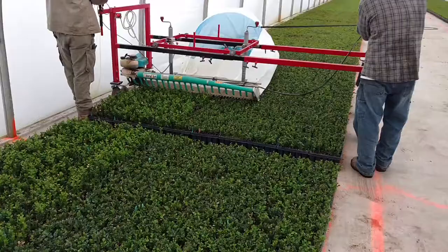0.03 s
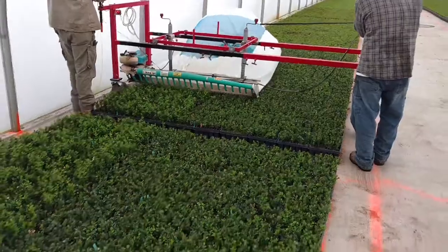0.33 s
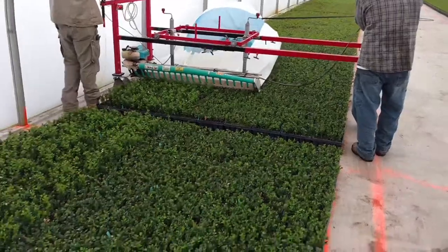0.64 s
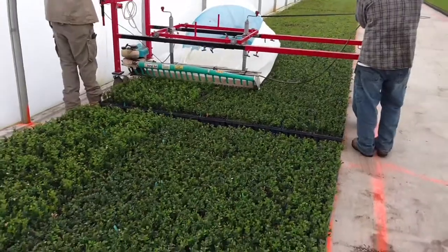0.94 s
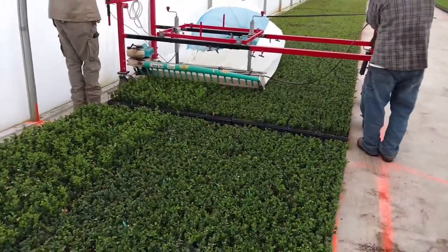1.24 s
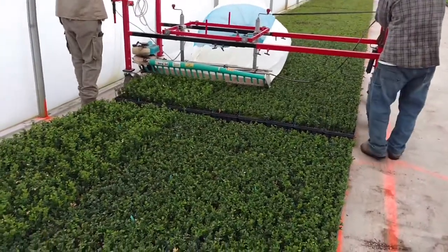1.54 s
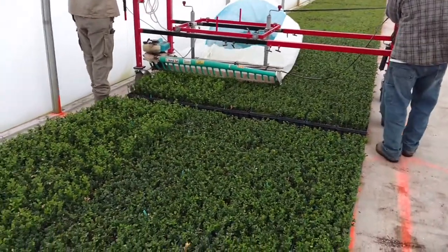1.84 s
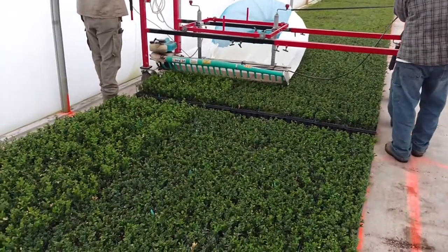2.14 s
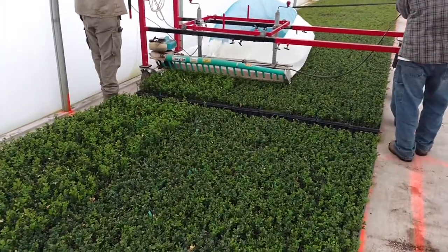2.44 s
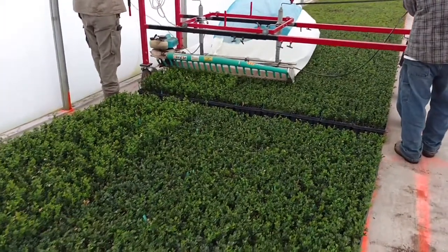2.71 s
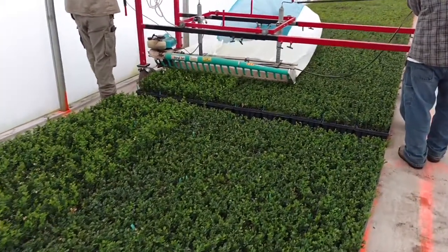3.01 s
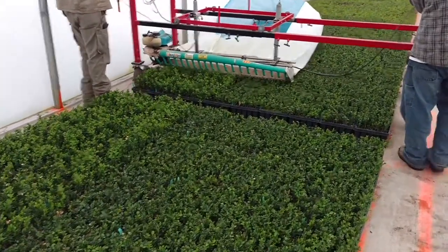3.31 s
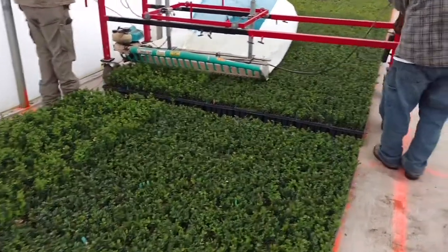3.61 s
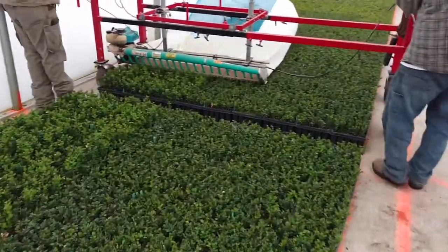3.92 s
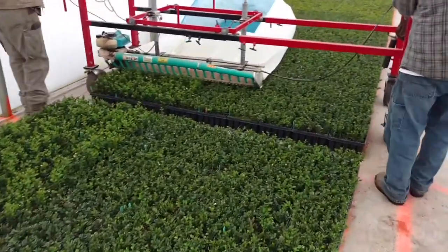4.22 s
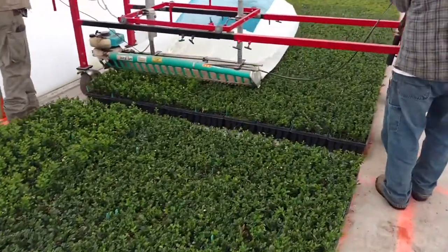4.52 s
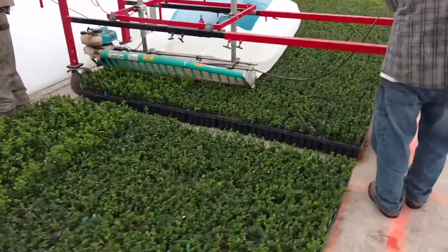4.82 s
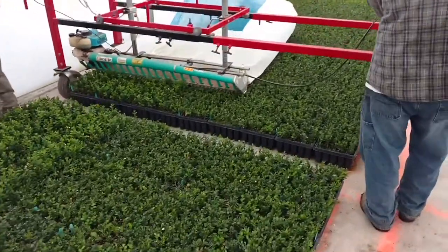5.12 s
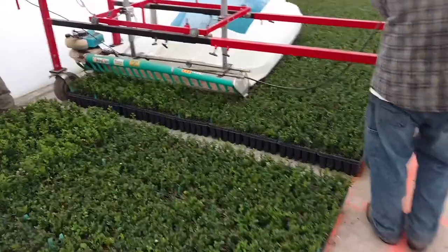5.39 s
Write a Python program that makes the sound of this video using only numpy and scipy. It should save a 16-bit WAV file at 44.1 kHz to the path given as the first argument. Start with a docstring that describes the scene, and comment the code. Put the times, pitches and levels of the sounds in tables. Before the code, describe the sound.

The steady buzzing drone of a motorised trimmer in a greenhouse, with whirring blades and finely crackling stems.

```python
"""Plant trimmer in a long greenhouse

A small petrol engine on a gantry drives a cutter bar, heard from a hand-held stereo camera. The exhaust
drones at a steady speed; standing waves lift and sink single notes as machine and listener move.
Fan and blades add a rush that beats with the firings and the knife strokes, and stems snap in the bar.
Near the end a finger shifts on the camera."""
import sys
import numpy as np
from scipy import signal
from scipy.fft import rfft, irfft
from scipy.io import wavfile
from scipy.ndimage import uniform_filter1d

SR = 44100
rng = np.random.default_rng(int(sys.argv[2]) if len(sys.argv) > 2 else 0)


def output_pcm(signal):
    """Save a mono or channel-first signal as 16-bit PCM at the path in sys.argv[1].

    Samples are clipped to [-1, 1] before scaling.
    """
    pcm = np.clip(np.atleast_2d(signal).T, -1, 1) * 32767
    wavfile.write(sys.argv[1], SR, np.round(pcm).astype(np.int16))


N = 244755
T = np.arange(N) / SR
HZ = np.fft.rfftfreq(N, 1 / SR)


def gain_of(db):
    """Decibels to amplitude."""
    return 10 ** (np.asarray(db) / 20)


def unit_rms(x):
    """Scales to rms 1."""
    return x / np.sqrt(np.mean(abs(x) ** 2) + 1e-20)


def spectrum(points):
    """Spreads (frequency, value) points over HZ on a log-frequency axis."""
    hz, value = np.transpose(points)
    return np.interp(np.log(HZ + 1), np.log(hz + 1), value)


def swell(curve, share=1):
    """A dB curve, or a share of its swing, as a gain of rms 1: only its shape counts."""
    return unit_rms(gain_of(share * np.interp(T, *np.transpose(curve))))


def nearing(db_per_s):
    """The steady rise of an approaching source, as a gain of rms 1."""
    return unit_rms(gain_of(db_per_s * T))


def arches(rows):
    """Smooth arches of level, in dB."""
    return sum(db * np.cos(np.pi * np.clip((T - s) / length, -.5, .5)) ** 2 for s, length, db in rows)


def drift(rate_hz, hop=16):
    """A smooth random wander of rms 1, up to about rate_hz."""
    frames = N // hop + 2
    hz = np.fft.rfftfreq(frames, hop / SR)
    slow = irfft(rfft(rng.standard_normal(frames)) / (1 + (hz / rate_hz) ** 4), frames)
    return unit_rms(np.interp(np.arange(N) / hop, np.arange(frames), slow))


def decays(kicks, decay_s):
    """Each kick becomes a sudden rise and a slow fall; mean 1."""
    shape = signal.lfilter([1], [1, -np.exp(-1 / (decay_s * SR))], kicks)
    return shape / shape.mean()


def impacts(per_s, decay_s):
    """The envelope of hits at random times and strengths; mean 1."""
    return decays(rng.exponential(1, N) * (rng.random(N) < per_s / SR), decay_s)


# Single exhaust orders in the standing waves at the microphone (time [s], relative level [dB])
ORDER_2 = [(.3, -36.5), (1.0, -36), (2.0, -36), (2.8, -38.5), (3.3, -38.5), (3.8, -38.7), (4.5, -39),
           (5.5, -41.5)]
ORDER_4 = [(.3, -28.5), (1.3, -28), (2.3, -30), (3.0, -26.5), (3.5, -28), (3.8, -26.5), (4.55, -26),
           (5.5, -28.5)]
ORDER_5 = [(.3, -27.5), (.9, -30), (2.2, -29.5), (2.8, -29.5), (3.05, -29.5), (3.52, -36.5), (3.9, -31.5),
           (4.7, -32), (5.5, -28)]
ORDER_6 = [(0.3, -27), (1.3, -31), (2.1, -31), (2.4, -29), (3.0, -27), (3.25, -27.5), (3.52, -41),
           (3.7, -29.5), (4.4, -27), (4.7, -33.5), (5.3, -39), (5.5, -39)]
ORDER_7 = [(.3, -32.5), (1.0, -34.5), (2.0, -30.5), (2.6, -27.5), (3.05, -31.5), (3.52, -49), (3.75, -31),
           (4.3, -35), (4.7, -36), (4.9, -32), (5.5, -34)]
ORDER_8 = [(0.3, -53), (0.41, -35), (1.79, -50), (4.2, -39), (4.96, -42), (5.21, -35), (5.5, -40)]
ORDER_9 = [(.3, -27), (1.35, -33.5), (1.7, -25), (2.1, -29), (2.45, -22.5), (3.0, -25.5), (3.7, -26),
           (4.5, -29.5), (5.5, -29)]
ORDER_10 = [(.3, -38), (1.9, -33), (2.25, -31), (2.6, -31), (3.2, -36), (3.65, -41), (4.0, -37),
            (4.7, -32.5), (5.5, -40)]
WHINE = [(0.35, -30), (0.52, -26.5), (0.85, -21.5), (1.25, -26.5), (1.6, -33), (1.9, -25.5), (2.3, -28.5),
         (2.6, -21.5), (3.1, -34.5), (3.35, -27.5), (4.0, -27), (4.6, -29), (5.03, -40.5), (5.2, -28),
         (5.5, -34.5)]
HIGH_WHINE = [(.3, -40), (.85, -35.5), (1.35, -33), (1.75, -36), (2.1, -43), (2.62, -35), (3.1, -42),
              (3.7, -40), (4.7, -44), (5.5, -37.5)]
# The midrange near 1.4 kHz, for order 11 and the rush alike (time [s], relative level [dB])
MIDRANGE = [(.3, -26), (.55, -24.8), (.9, -26), (2.0, -26.5), (2.6, -25.5), (3.0, -24.5), (3.45, -26.5),
            (3.72, -28), (4.0, -25.5), (4.8, -26.5), (5.5, -24.5)]
# Orders that grow as the machine rolls nearer (order, rise [dB/s])
APPROACH = [(1, 0.5), (3, 2)]
# Low orders that come up as the listener shifts out of a standing-wave hollow (order, rise [dB])
OUT_OF_HOLLOW = [(1, 1.5), (3, 5.5)]


def standing_waves(order, shift_s=2.43, shift_length_s=0.41):
    """One order swells and sinks as machine and microphone move through the standing waves; rms 1."""
    curves = {2: ORDER_2, 4: ORDER_4, 5: ORDER_5, 6: ORDER_6, 7: ORDER_7, 8: ORDER_8, 9: ORDER_9,
              10: ORDER_10, 11: MIDRANGE, 12: WHINE, 24: HIGH_WHINE}
    shifted = np.clip((T - shift_s) / shift_length_s + .5, 0, 1)
    gain = nearing(dict(APPROACH).get(order, 0))
    gain *= gain_of(dict(OUT_OF_HOLLOW).get(order, 0) * shifted)
    if order in curves:
        gain *= swell(curves[order])
    return unit_rms(gain)


# The exhaust's drone (order [multiple of the firing rate], mean level [dB])
EXHAUST_ORDERS = [(1, -31.0), (2, -37.5), (3, -44.3), (4, -29.4), (5, -29.9), (6, -30.1), (7, -31.9),
                  (8, -38.7), (9, -30.1), (10, -37.0), (11, -41.0), (12, -26.4), (13, -37.0), (14, -43.7),
                  (15, -41.8), (16, -47.2), (17, -43.8), (18, -42.8), (19, -42.2), (20, -44.1), (21, -46.9),
                  (22, -47.1), (23, -49.0), (24, -37.4), (25, -45), (26, -49), (27, -48), (28, -46),
                  (29, -48), (30, -46)]


def exhaust(firings, smear_rad=.03, scatter_rad=0.14, knock_cycles=.6, intake_rad=.75, wander_hz=1.57):
    """Firing pulses as a stack of orders, each a direct part plus a wandering wall echo: mid and side."""
    levels_db = [db for _, db in EXHAUST_ORDERS]
    levels_db += [-50 - 0.14 * k + 2 * rng.standard_normal() for k in range(30)]  # faint top orders
    mid, side = np.zeros((2, N))
    for order, db in enumerate(levels_db, 1):
        echo = np.clip(0.22 + 0.05 * (order - 1), 0, .9)  # higher orders arrive more by the walls
        if order in (1, 2, 4, 5, 6, 7, 9, 10, 12, 24):
            echo *= 0.21  # the strong orders wander less
        lag = smear_rad * order ** 2  # the muffler smears each pulse
        lag += scatter_rad * max(order - 9, 0) ** 1.5 * rng.standard_normal()  # walls scatter its top
        lag += 2 * np.pi * order * knock_cycles * (order >= 8)  # low orders thump, high ones knock later
        lag += intake_rad * (order % 2)  # the intake: a weaker pulse half a cycle later
        level = gain_of(db) * np.sqrt(2) * standing_waves(order)
        tone = -level * np.exp(1j * (2 * np.pi * order * firings - lag))
        mid_echo, side_echo = (unit_rms(drift(wander_hz) + 1j * drift(wander_hz)) for _ in range(2))
        mid += (tone * (np.sqrt(1 - echo ** 2) + echo * mid_echo)).real
        side += (tone * side_echo).real
    return np.array([mid, side])


def knife_strokes(firings, decay_s=0.0095, uneven_db=2.5):
    """The force of the knife, geared to three strokes in eight firings; mean 1."""
    stroke = np.floor(firings * 3 / 8)
    force = 1 + 0.17 * (-1) ** stroke  # harder going out than coming back
    force *= gain_of(uneven_db * rng.standard_normal(N))
    kicks = np.diff(stroke, prepend=0) * force
    return uniform_filter1d(decays(kicks, decay_s), size=220)  # teeth close over 5 ms


# The hollow-sounding band of the rush near 1 kHz (time [s], relative level [dB])
HOLLOW_BAND = [(.3, -26), (.55, -27.5), (.85, -27.5), (1.2, -28.5), (1.55, -27), (2.1, -29.5), (2.6, -24.5),
               (2.8, -28.5), (3.0, -25), (3.2, -28.5), (3.7, -30), (3.95, -30), (4.7, -30), (5.5, -30)]
# The blades rasp louder where the bar meets thicker growth (middle [s], length [s], rise [dB])
THICKETS = [(1.05, .3, .6), (1.84, 0.29, 1.7), (2.57, .36, 2), (3.02, 0.16, 1.5), (3.33, 0.084, 0.2),
            (3.5, .12, 0.2), (5.14, 0.27, 0)]


def rush_swells(shared_db=0.27, own_db=0.37, waver_hz=9):
    """Slow gains of the rush's four bands: all waver, thickets add rasp, hiss grows as the bar nears."""
    shared_waver = shared_db * drift(waver_hz)
    thicket_db = arches(THICKETS)
    puffs = swell(MIDRANGE) * gain_of(0.29 * thicket_db)
    blades = swell(MIDRANGE, share=0.42) * gain_of(thicket_db)
    hiss = swell(MIDRANGE, share=0.1) * nearing(db_per_s=0.48) * gain_of(thicket_db / 2)
    return [unit_rms(level * gain_of(shared_waver + own_db * drift(waver_hz)))
            for level in (puffs, swell(HOLLOW_BAND), blades, hiss)]


# The rush of fan and blades from where the listener stands (frequency [Hz], relative density [dB])
RUSH_COLOUR = [(30, -42), (90, -18), (190, -18), (330, -16.3), (620, -8.5), (1050, -1), (1450, 0.9),
               (2050, -5.5), (2550, -2), (3700, -4), (5000, -10), (6200, -11.5), (7400, -16), (9500, -14.5),
               (15000, -26)]


def rush(firings, cutting, level_db=-21.5, hollow_hz=992, hollow_half_width_hz=148):
    """Noise in bands: exhaust puffs below, blade clatter above and leaf hiss on top; mid and side."""
    bites = impacts(per_s=75, decay_s=0.0069)  # uneven mouthfuls of foliage
    loose_teeth, loose_leaves = (impacts(per_s=520, decay_s=0.0037) for _ in range(2))
    pulsing = np.exp(0.079 * (np.cos(2 * np.pi * firings) + .5 * np.cos(4 * np.pi * firings)))
    puffs = pulsing * np.sqrt(1 + 0.15 * bites)
    blades = np.sqrt(0.35 + 0.4 * cutting + 0.48 * bites + 0.84 * loose_teeth)
    hiss = np.sqrt(0.84 + 0.51 * cutting + 0.16 * bites + 0.67 * loose_leaves)
    low = 1 / (1 + (HZ / 2200) ** 8)
    high = 1 - 1 / (1 + (HZ / 5200) ** 8)
    between = np.clip(1 - low - high, 0, 1)
    hollow = 1 / (1 + ((HZ - hollow_hz) / hollow_half_width_hz) ** 4)
    bands = [(low * (1 - hollow), puffs), (low * hollow, puffs), (between, blades), (high, hiss)]
    colour = unit_rms(gain_of(spectrum(RUSH_COLOUR)))
    mid_side = np.zeros((2, N))
    for (power_share, envelope), slow_gain in zip(bands, rush_swells()):
        noise = rng.standard_normal((2, N)) * unit_rms(envelope) * slow_gain
        mid_side += irfft(rfft(noise) * colour * np.sqrt(power_share), N)
    return gain_of(level_db) * mid_side


def stem_snaps(cutting, per_s=420, level_db=-36.0, ring_s=0.00058):
    """Stems snap at random as the knife closes; the sound comes straight over, to the left port first."""
    sizes = gain_of(0.98 * np.minimum(rng.exponential(1, N), 4))
    snapped = rng.random(N) < cutting * per_s / SR
    bursts = decays(sizes * snapped, ring_s) * rng.standard_normal(N)
    colour_db = spectrum([(900, -16), (1800, -4), (4000, 2.0), (6000, -8), (10000, -9.5), (15000, -25)])
    left = gain_of(level_db) * unit_rms(irfft(rfft(bursts) * gain_of(colour_db), N))
    return np.array([left, np.roll(left, 4)])


# The greenhouse's diffuse sound at the microphone ports (frequency [Hz], side over mid [dB])
DIFFUSE_FIELD = [(100, -29), (350, -23.5), (800, -11.5), (1250, -11), (1650, -1.5), (2300, -1.5), (4700, 1),
                 (5700, -3.5), (8500, 1), (14000, 2)]
# The left port is the more sensitive one (frequency [Hz], left over right [dB])
PORT_MISMATCH = [(131, 3.8), (263, 3.8), (525, 2.4), (900, 2.2), (1600, 6.5), (2300, 2.6), (14000, 2)]
# The camera's stereo widener (frequency [Hz], share of the other port taken away)
WIDENER = [(300, 0.99), (3500, 0.81), (9000, 0.55), (13500, 0.62)]
# A further lean of the stereo image (frequency [Hz], left over right [dB])
IMAGE_LEAN = [(131, 1.5), (263, 3.4), (394, 1.5), (700, 1.2), (1050, -0.5), (2100, -2), (3500, 0),
              (8500, 0.7), (13000, 0)]


def camera_microphone(mid_side, delay_samples=17):
    """Two close, unequal ports and a widener: each channel gets the other one late and inverted."""
    crossfeed = np.clip(spectrum(WIDENER), 0, .95) * np.exp(-2j * np.pi * HZ * delay_samples / SR)
    diffuse = gain_of(spectrum(DIFFUSE_FIELD))
    mismatch = gain_of(spectrum(PORT_MISMATCH))
    leak = (mismatch - 1) / (mismatch + 1)  # unequal ports mix mid and side
    mid_in, side_in = rfft(mid_side)
    mid = (1 - crossfeed) * (mid_in + leak * diffuse * side_in)
    side = (1 + crossfeed) * (leak * mid_in + diffuse * side_in)
    lean = gain_of(spectrum(IMAGE_LEAN) / 2)
    left_right = np.array([(mid + side) * lean, (mid - side) / lean])
    power = abs(1 - crossfeed) ** 2 * (1 + (leak * diffuse) ** 2)
    power += abs(1 + crossfeed) ** 2 * (leak ** 2 + diffuse ** 2)
    return irfft(left_right / np.sqrt(power * (lean ** 2 + lean ** -2) / 2), N)  # even total power


# Brief dips in the whole machine's sound (middle [s], length [s], depth [dB])
LEVEL_DIPS = [(0.365, 0.19, 2.1), (0.634, 0.11, 2), (0.806, 0.21, 2.1), (1.362, 0.27, 2), (1.66, 0.19, 1.9),
              (2.076, 0.67, 1.3), (2.38, 0.28, 1.7), (2.845, 0.26, 2.5), (3.134, 0.23, 1.4),
              (3.58, 0.15, 2), (4.838, 0.12, 1.1), (4.982, 0.091, 2), (5.43, 0.14, 1.5)]


def dips():
    """The level sinks and comes back in smooth arches; a gain of rms 1."""
    return unit_rms(gain_of(-arches(LEVEL_DIPS)))


def finger_bump(at_s=5.449, peak_db=-38, width_s=0.0035):
    """A finger shifts and gives the camera body a soft push."""
    offset = (T - at_s) / width_s
    return gain_of(peak_db) * np.exp(-offset ** 2) * np.cos(2 * offset)


# The engine's speed (time [s], firing rate [Hz])
FIRING_RATE = [(0.3, 131.32), (0.75, 131.12), (1.3, 131.17), (1.8, 130.92), (2.35, 131.32), (2.8, 131.5),
               (3.3, 131.1), (3.75, 131.62), (4.95, 131.55), (5.3, 131.38)]


def scene():
    """The trimmer as heard at the camera: one slightly hunting engine drives drone and cutter alike."""
    firing_hz = np.interp(T, *np.transpose(FIRING_RATE)) * (1 + .0007 * drift(rate_hz=20))
    firings = np.cumsum(firing_hz) / SR
    cutting = knife_strokes(firings)
    machine = camera_microphone(exhaust(firings) + rush(firings, cutting))
    return (machine + stem_snaps(cutting)) * dips() + finger_bump()


def record(dry, start_s=.15, fade_s=0.15, edge_hz=15350):
    """The camera starts up, fades in and cuts off the highest treble."""
    faded = dry * np.clip((T - start_s) / fade_s + 0.06, 0, 1) * (T > start_s)
    lowpass = signal.firwin(511, edge_hz, window=("kaiser", 9), fs=SR)
    return signal.oaconvolve(faded, lowpass[None], "same")


dry = scene()
out = record(dry)
output_pcm(out)
```